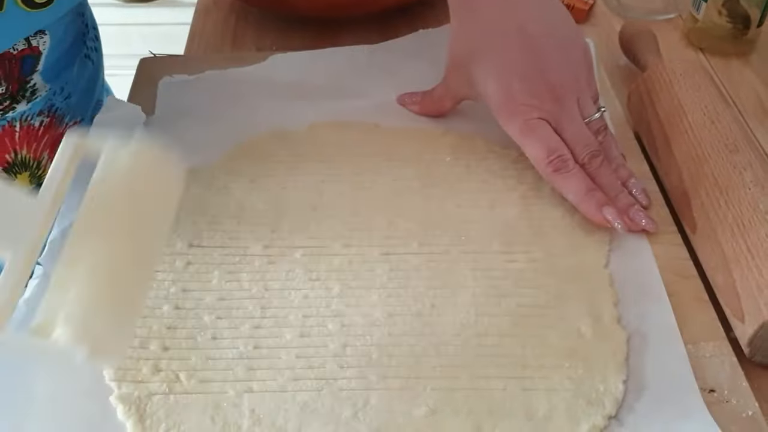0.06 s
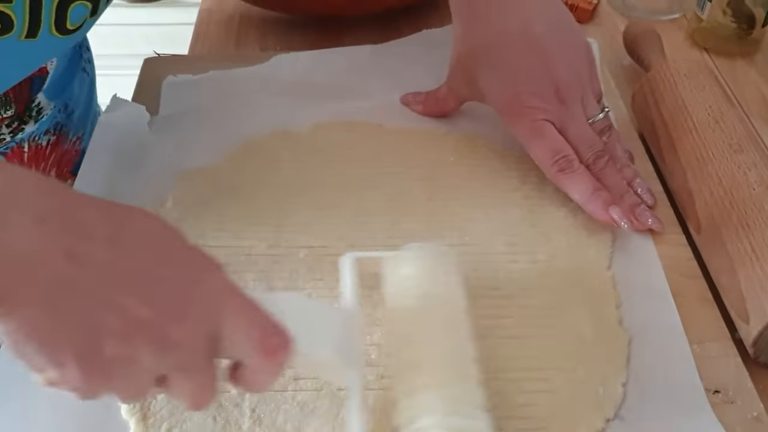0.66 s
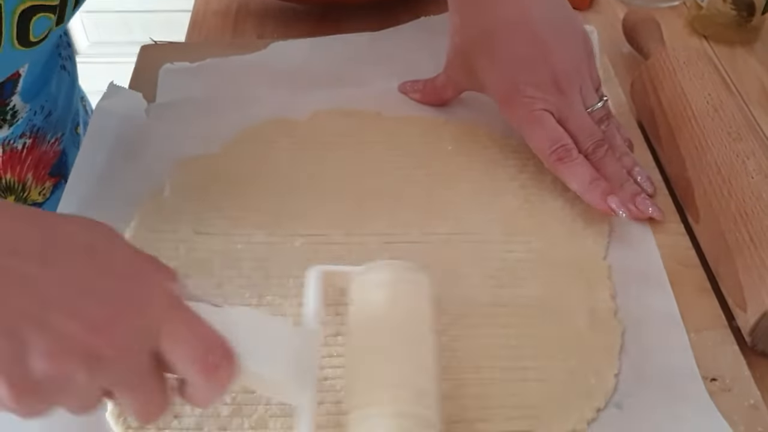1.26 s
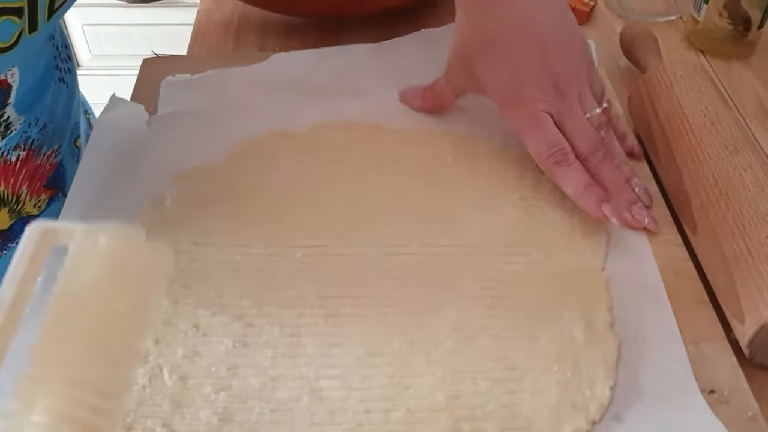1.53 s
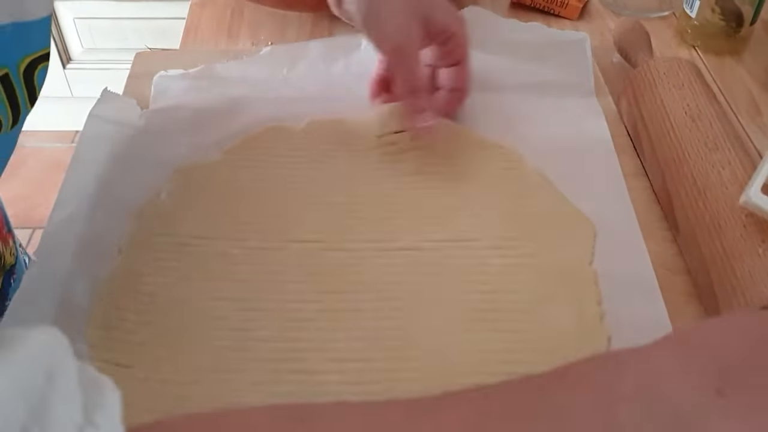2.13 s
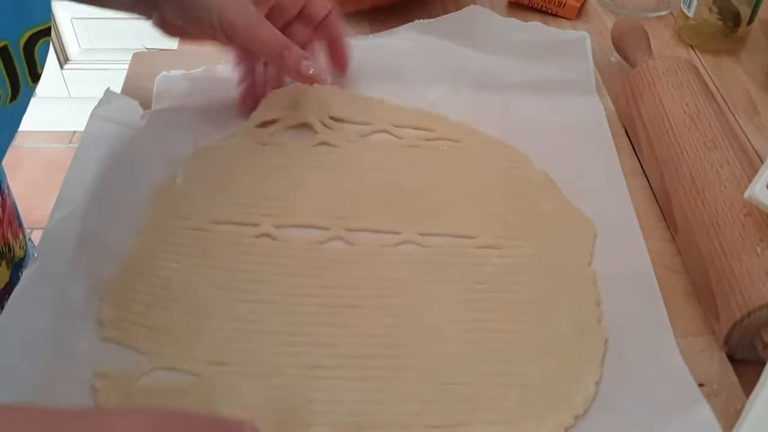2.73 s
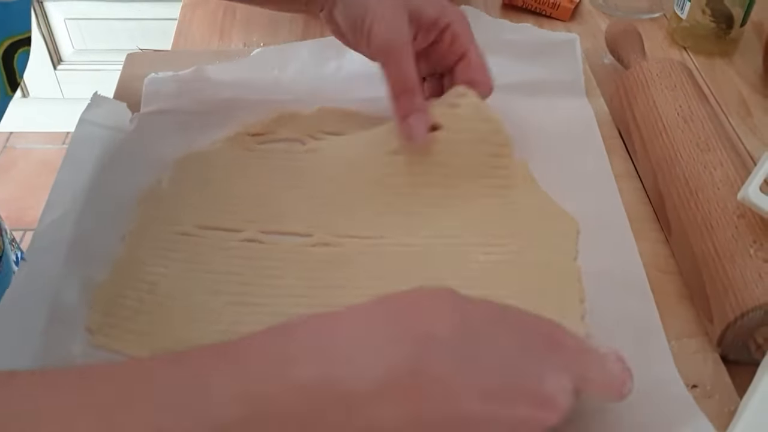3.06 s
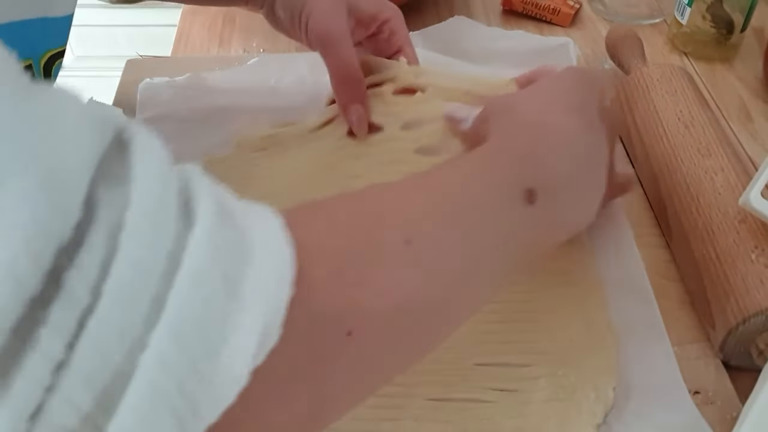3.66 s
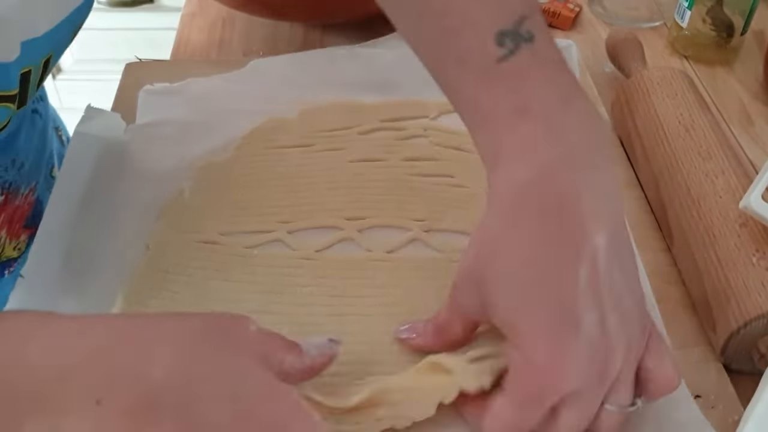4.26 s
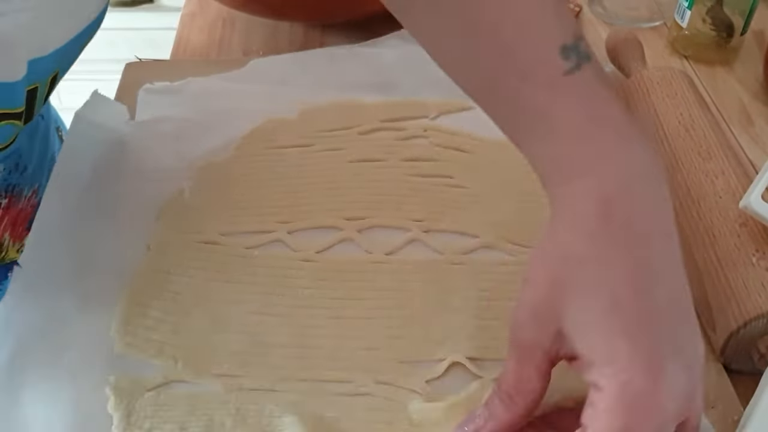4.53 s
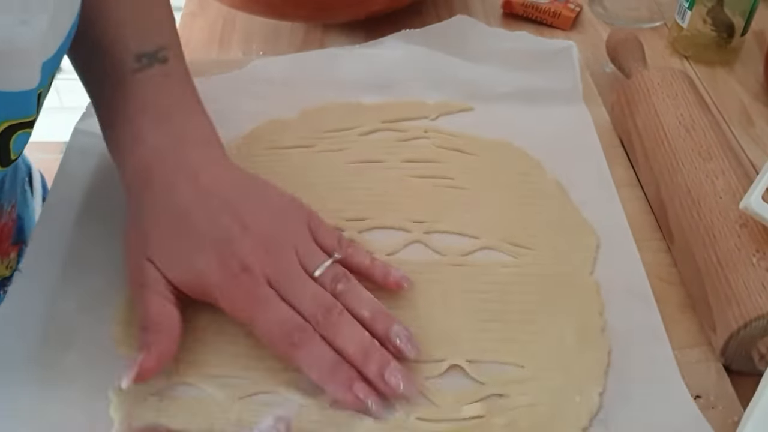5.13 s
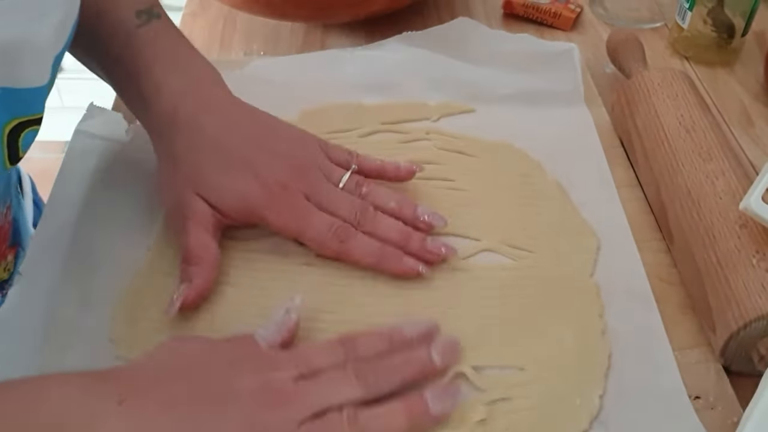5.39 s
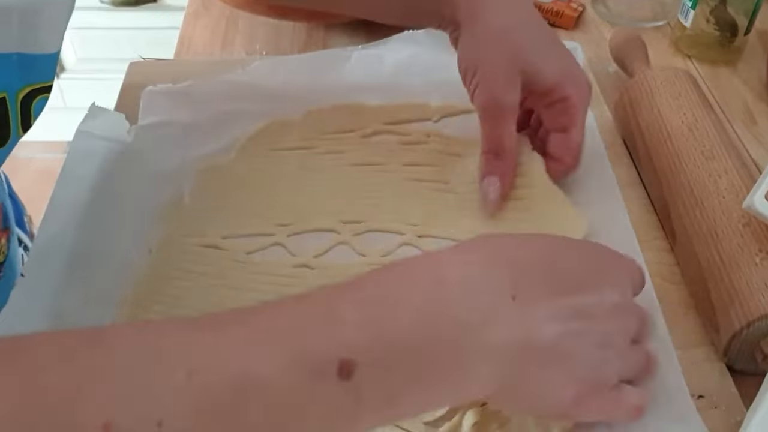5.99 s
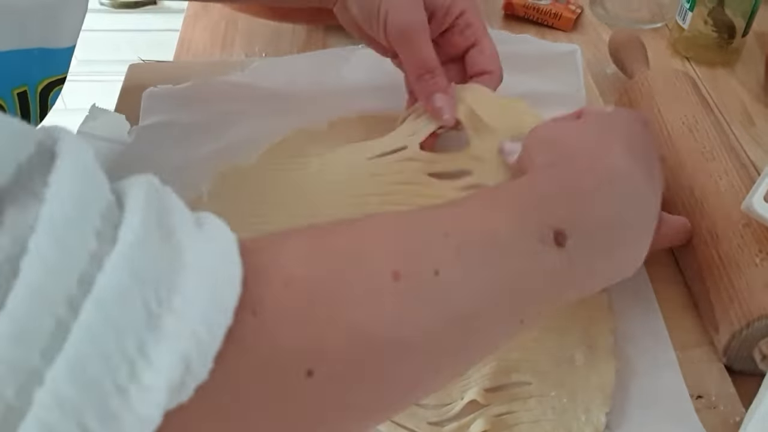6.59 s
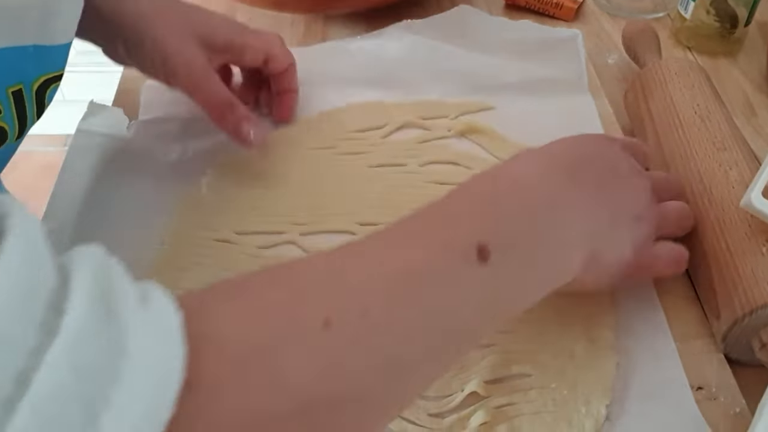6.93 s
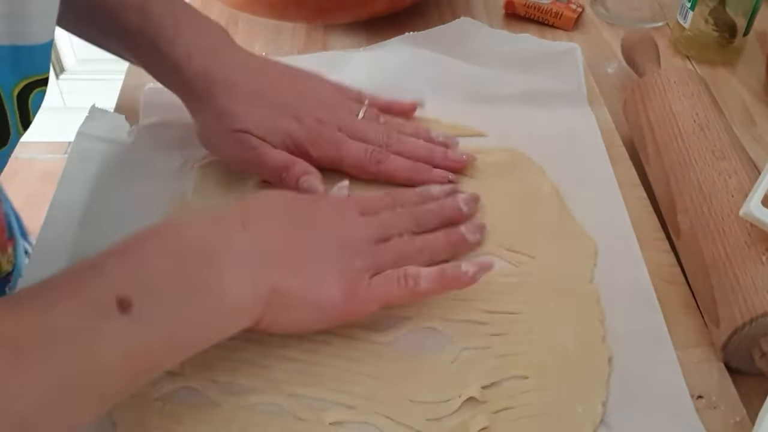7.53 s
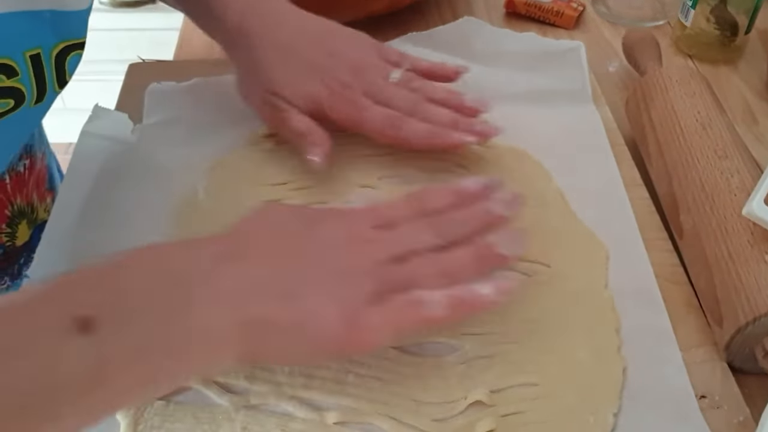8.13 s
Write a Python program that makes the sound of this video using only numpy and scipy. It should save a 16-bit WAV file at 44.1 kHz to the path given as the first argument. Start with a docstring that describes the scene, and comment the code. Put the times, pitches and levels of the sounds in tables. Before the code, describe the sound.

Scratchy sliding and crinkling of baking paper on wood as dough is rolled, pulled and patted, with a few plastic knocks and a low hum.

```python
"""Baking paper under thin pastry, close to a stereo microphone, slides on a wooden table in countless
tiny slips and snaps where it buckles. A plastic lattice roller runs over the pastry, knocks in its frame
and is put down; hands then pull the dough open and pat it flat, dragging the paper in scratchy strokes.
The place is a small kitchen with near walls, a mains hum and a low rumble all around."""
import sys
import numpy as np
from scipy import signal
from scipy.fft import rfft, irfft
from scipy.io import wavfile
from scipy.ndimage import uniform_filter1d, map_coordinates

SR = 44100
rng = np.random.default_rng(int(sys.argv[2]) if len(sys.argv) > 2 else 0)


def inscribe(sig):
    """Save sig as 16-bit PCM at rate SR to the path in sys.argv[1].

    A 1-D sig is mono; a 2-D sig holds one channel per row.
    Samples are clipped to [-1, 1] before scaling.
    """
    pcm = np.round(np.clip(np.atleast_2d(sig).T, -1, 1) * 32767)
    wavfile.write(sys.argv[1], SR, pcm.astype(np.int16))


N = 364266
TIME = np.arange(N) / SR
FREQ = np.maximum(np.fft.rfftfreq(N, 1 / SR), 1)
SIDES = np.array([[.5], [-.5]])  # splits a left-minus-right amount between the channels


def amp(db):
    """Decibels to gain."""
    return 10 ** (np.asarray(db) / 20)


def unit(x):
    """Scale to rms 1."""
    return x / np.sqrt(np.mean(x ** 2))


def shape(x, gain):
    """Filter by a gain for each frequency."""
    return irfft(rfft(x) * gain, N)


def colour(points):
    """Gain for each frequency from (frequency [Hz], level [dB]) points."""
    hz, db = np.transpose(points)
    return amp(np.interp(np.log(FREQ), np.log(hz), db))


def below(hz, order=8):
    """Gain of a smooth low-pass."""
    return 1 / np.sqrt(1 + (FREQ / hz) ** (2 * order))


def resonance(hz, width):
    """Gain of one resonance, 1 at its centre."""
    return 1 / np.sqrt(1 + (2 * (FREQ - hz) / width) ** 2)


def noise():
    """Unrelated white noise for left and right."""
    return rng.standard_normal((2, N))


def walk(per_s):
    """A random wander of rms 1."""
    knots = rng.standard_normal(N // 16)
    return unit(np.interp(TIME * per_s, np.arange(len(knots)), knots))


def burst(at, rise_ms, decay_ms):
    """Envelope of a contact that builds up abruptly and dies away."""
    ms = (TIME - at) * 1000
    fall = np.where(ms < 0, (ms / rise_ms) ** 2, ms / decay_ms)
    return np.exp(-np.minimum(fall, 20))


def widen(x, centred_rad=.33, wide_rad=2.74, halfway_rad=1.73, halfway_from_s=2.05, slew_s=.011):
    """Left and right go out of phase: the bass sits wide, later half-way, and at times in the centre."""
    # spells in which the bass draws to the centre: (start [s], end [s])
    centred_spells = [(0, 0.11), (1.02, 1.17), (1.24, 1.36), (1.62, 1.78), (3.83, 4)]
    angle = np.where(TIME < halfway_from_s, wide_rad, halfway_rad)
    for start, end in centred_spells:
        angle[(TIME >= start) & (TIME < end)] = centred_rad
    phase = uniform_filter1d(angle, int(slew_s * SR)) * SIDES
    return np.real(signal.hilbert(x) * np.exp(1j * phase))


def kitchen(rumble_db=-45, sway_db=1, hum_hz=100, hum_db=-45, bass_edge_hz=190):
    """Room tone: mains hum and swaying rumble reach both channels as one sound, under a diffuse hiss."""
    # spectrum of the still kitchen: (frequency [Hz], level [dB])
    room_tone = [(20, -12.5), (35, 2), (55, -3.5), (75, 2), (140, 1), (200, 0.5), (280, 0), (420, -10.5),
                 (600, -13), (700, -18.5), (750, -11.5), (820, -18), (1100, -27), (2000, -33.5),
                 (5000, -41), (9000, -49.5), (14000, -39.5)]
    level = amp(rumble_db + sway_db * walk(9))
    diffuse = level * unit(shape(noise(), colour(room_tone)))
    shared = level * unit(shape(noise()[0], colour(room_tone)))
    bass = below(bass_edge_hz, order=2)
    hum = amp(hum_db) * unit(np.sin(2 * np.pi * hum_hz * TIME))
    return widen(hum + shape(shared, bass)) + shape(diffuse, np.sqrt(1 - bass ** 2))


def creases(x, spread_db=2, width_hz=350, hold_s=.022):
    """The sheet bends under the hands, so its many broad resonances keep shifting."""
    hz, seconds, frames = signal.stft(x, SR, nperseg=512)
    field = rng.standard_normal((400, 600))
    place = np.meshgrid(hz / width_hz, seconds / hold_s, indexing="ij")
    gain = amp(spread_db * map_coordinates(field, place, order=3, mode="wrap"))
    return signal.istft(frames * gain, SR)[1][:, :N]


def crinkles(per_s=30, size_db=2, decay_ms=3):
    """Now and then a small crease gives way and lifts the level, in dB, for a few milliseconds."""
    gives = rng.random(N) < per_s / SR
    lift_db = size_db * np.minimum(rng.exponential(size=N) + 1, 3)
    return signal.lfilter([1], [1, -np.exp(-1000 / (decay_ms * SR))], gives * lift_db)


def sheet(drive, body_edge_hz=2500, air_edge_hz=8500):
    """The paper's response to a drive, as body (low), hiss (middle) and air (top) bands of rms 1."""
    # colour of the sliding paper: (frequency [Hz], level [dB])
    paper_colour = [(250, 2), (500, -1.5), (800, -2.5), (1200, 0.5), (1800, 2.5), (2600, -1.5), (4300, 4),
                    (5500, 3.5), (6400, 2), (7400, 1.5), (8700, -13), (11500, -8), (13200, -9),
                    (16000, -14.5)]
    spectrum = rfft(drive) * colour(paper_colour)
    low, mid = below(body_edge_hz), below(air_edge_hz, order=16)
    bands = low, np.sqrt(1 - low ** 2) * mid, np.sqrt(1 - mid ** 2)
    return [unit(irfft(spectrum * band, N)) for band in bands]


def moves(pat_air_db=.5, settle_db=-6, settle_t60_s=.18, step_s=.001):
    """Levels in dB of body, hiss and air: each move is one arch of speed, then the sheet settles."""
    # the roller shifts the paper under the pastry; the second row is the crackle that lingers after the sheet
    # buckles at 0.068 s: # (start [s], length [s], fastest at [share of length], hiss [dB], body [dB re hiss],
    # air [dB re hiss])
    rolls = [(-0.002, 0.023, 0.53, -46.5, 0, -1), (0.04, 0.088, 0.34, -54.5, -12.0, -11.5),
             (0.414, 0.071, 0.38, -69.5, -15, 1), (0.506, 0.11, 0.3, -65.0, -16, -7.0),
             (0.607, 0.35, 0.27, -49, -3.5, -3), (0.964, 0.058, 0.44, -52.0, -8.5, -4.0),
             (1.212, 0.372, 0.49, -54.5, -3, -2.5), (1.482, 0.077, 0.29, -47, -5, -7),
             (1.551, 0.14, 0.46, -48.5, -15.0, -2), (1.733, 0.14, 0.3, -54, -21, -1),
             (1.885, 0.097, 0.16, -50.5, -2.5, 2.5)]
    # a hand pulls the dough and drags the paper along: columns as in rolls
    pulls = [(1.941, 0.431, 0.56, -47.5, -3, 1.5), (2.265, 0.44, 0.44, -39, -7.5, -1),
             (2.356, 0.12, 0.62, -28.5, -7.5, 2), (2.667, 0.14, 0.52, -30.5, -10.5, -1),
             (2.856, 0.093, 0.53, -33, -10.5, -1), (2.919, 0.18, 0.39, -36.0, -11.5, 0.5),
             (3.085, 0.15, 0.57, -31, -13, -3), (3.227, 0.26, 0.5, -48.5, -8.5, 1),
             (3.465, 0.11, 0.55, -56.5, -4.5, 4.5), (3.571, 0.12, 0.45, -46, -15, -0.5),
             (3.674, 0.12, 0.53, -43, -4.5, -1), (3.889, 0.42, 0.37, -37.5, -8.5, 0.5),
             (4.101, 0.19, 0.35, -31.5, -11.5, -1.5), (4.206, 0.212, 0.34, -40.5, -11.5, 0),
             (4.377, 0.097, 0.73, -33, -11.5, -1), (4.497, 0.073, 0.69, -26.5, -14.5, -1),
             (4.578, 0.13, 0.63, -28, -13, -6.0), (5.049, 0.15, 0.39, -37.5, -7.5, -2.5),
             (5.165, 0.13, 0.52, -37, -7.5, -1), (5.861, 0.21, 0.37, -36, -13.5, -2),
             (6.054, 0.16, 0.31, -37.5, -14.5, -1.0), (6.162, 0.22, 0.48, -43, -8.5, 0.0),
             (6.322, 0.23, 0.32, -51, -18, 2.5), (6.513, 0.162, 0.35, -41, -13, 2),
             (6.668, 0.071, 0.56, -54, -18, 4.5), (6.774, 0.071, 0.82, -46.5, -1.5, -0.5),
             (6.917, 0.29, 0.35, -40, -10.5, 1), (7.047, 0.148, 0.64, -32.0, -8.5, -0.5),
             (7.168, 0.22, 0.37, -45.0, -5.5, -0.5), (7.315, 0.22, 0.41, -42.5, -10, 0.5)]
    # a flat hand pats the dough and the paper slides briefly: columns as in rolls, without air
    pats = [(4.784, 0.067, 0.49, -33.5, -14), (4.932, 0.109, 0.1, -37.5, -5.5),
            (5.387, 0.067, 0.6, -38.5, -14.5), (5.517, 0.1, 0.61, -34.5, -22),
            (5.69, 0.042, 0.55, -42, -16), (7.565, 0.1, 0.58, -40.5, -18), (7.721, 0.094, 0.51, -45, -18),
            (7.868, 0.13, 0.43, -45, -16.0), (8.078, 0.088, 0.49, -36.5, -13.5)]
    roll_power, pull_power, pat_power = .73, 1, 1.82  # a higher power makes the arch more pointed
    strokes = [(*roll, roll_power) for roll in rolls]
    strokes += [(*pull, pull_power) for pull in pulls]
    strokes += [(*pat, pat_air_db, pat_power) for pat in pats]
    t = np.arange(0, N / SR, step_s)
    energy = 1e-12
    for start, length, fastest, db, body_db, air_db, power in strokes:
        progress = np.clip((t - start) / length, 0, 1)
        skew = np.log(.5) / np.log(np.clip(fastest, .1, .9))
        speed = np.abs(np.sin(np.pi * progress ** skew))
        band_gains = amp(db + np.array([body_db, 0, air_db]))
        energy = energy + np.outer(band_gains, speed ** power) ** 2
    retained = np.exp(-2 * np.log(1000) * step_s / settle_t60_s)
    settling = amp(settle_db) ** 2 * signal.lfilter([1 - retained], [1, -retained], energy)
    return [np.interp(TIME, t, 10 * np.log10(band)) for band in energy + settling]


def sliding(slips_per_s=1800, size_db=3, grit_db=-14.5, judder_db=1, grip_db=.97, flicker_db=1.3):
    """Paper on wood moves in tiny slips; the grip is uneven and the sheet judders as it catches."""
    slips = rng.random(N) < slips_per_s / SR
    sizes = amp(size_db * np.minimum(rng.exponential(size=N), 5))
    grains = uniform_filter1d(slips * sizes, size=8)  # a slip lasts a fraction of a millisecond
    friction = creases(noise() * (1 + amp(grit_db) * unit(grains)))
    pressure_db = judder_db * walk(170) + crinkles() + grip_db * walk(35)
    balance_db = 0, -.8, .6  # body, hiss, air
    return sum(band * amp(move_db + pressure_db + band_db + flicker_db * walk(60))
               for band, move_db, band_db in zip(sheet(friction), moves(), balance_db))


def snaps(rise_ms=3.86, decay_ms=4.8, gain_db=-.84, board_hz=1250, board_width_hz=1500):
    """Short bursts of crackle from the same sheet, dull under a finger and bright at a crease."""
    # the paper buckles or a finger taps it:
    # (time [s], hiss [dB], body [dB re hiss], air [dB re hiss], left minus right [dB])
    buckles = [(0.068, -33.5, -19, -12, -1), (0.5195, -46.5, -8, -2, -1), (1.2293, -45.5, -4.5, -17, 0),
               (1.516, -32, -9, -11, 1), (2.2783, -20, -12.5, -3, -2.5), (2.3926, -24.5, -7, 4.5, 2),
               (2.464, -25.5, -19, 0, 1), (2.5264, -23, -12, 2, 1.5), (2.677, -34.5, -19, 3, 1),
               (2.876, -36, -3, 5, -3), (2.907, -30.5, -11, -2, -7), (2.998, -37, 3.5, -5, 2),
               (3.185, -34, 3.5, -10, -1), (3.3143, -32.5, 4, -22, 1.5), (3.4066, -33.5, -5, -4, -2),
               (4.122, -27, -14, 3, 1), (4.514, -37, -15, 3, 0), (4.6314, -20.5, -15, 3, -1),
               (4.7214, -32.5, -8, -25, -2), (4.776, -33.5, -20, -6, 0), (4.804, -36.5, -17, 11, 2),
               (5.084, -29.5, -0.5, 6.5, 2.5), (5.2813, -24, -11, -5, 2), (5.885, -26, -7.5, -11, -3.5),
               (5.9982, -25, -5.5, -23, 1), (6.136, -31, -7, -8, -1), (6.2513, -28, -0.5, -26, -1.5),
               (7.0864, -26, -29, 0.5, -8), (7.1335, -22, -20, -11, -7), (7.2594, -42.5, 3, 3, -4),
               (7.326, -23, -10.5, 8.5, -4), (7.346, -26.5, -5.5, -2, 1.5)]
    body, hiss, air = sheet(creases(noise()))
    body = unit(shape(body, resonance(board_hz, board_width_hz)))  # the wood beneath answers a tap
    out = 0
    for at, db, body_db, air_db, pan_db in buckles:
        crackle = hiss + amp(body_db) * body + amp(air_db) * air
        out += amp(db + gain_db + pan_db * SIDES) * burst(at, rise_ms, decay_ms) * crackle
    return out


def roller_knocks(rise_ms=3.1, tick_db=-11, gain_db=-2.5, accent_db=-1, accent_width_hz=600):
    """The roller's axle rattles against the hollow plastic frame."""
    # knocks of the axle: (time [s], level [dB], most excited resonance [Hz], decay [ms])
    knocks = [(0.706, -23, 1880, 3.2), (0.7506, -17.5, 3930, 4.9), (0.767, -33, 1400, 12),
              (0.844, -28.5, 2200, 2.3), (1.8735, -33, 2080, 6), (1.9526, -39, 1900, 7.7),
              (1.98, -23.5, 3620, 8.1)]
    # resonances of the plastic frame: (frequency [Hz], width [Hz], level [dB])
    frame_modes = [(322, 92, -8), (705, 150, -6), (970, 87, -3), (1520, 320, -11), (3060, 310, -19),
                   (4050, 160, -34), (4640, 130, -28), (6090, 200, -14)]
    frame_power = amp(tick_db) ** 2
    frame_power += sum((amp(db) * resonance(hz, width)) ** 2 for hz, width, db in frame_modes)
    rattle, out = noise(), 0
    for at, db, hz, decay_ms in knocks:
        accent = amp(accent_db) * resonance(hz, accent_width_hz)
        response = np.sqrt(frame_power + accent ** 2)
        contact = below(200000 * amp(db), order=1)  # harder knocks are brighter
        knock = unit(shape(rattle, response * contact))
        out += amp(db + gain_db) * burst(at, rise_ms, decay_ms) * knock
    return out


def roller_landing(rise_ms=3, crack_ms=2.1, crack_hz=5500, ring_db=-9):
    """The roller hits the table and bounces; each contact cracks, and the first sets it ringing."""
    # contacts with the table: (time [s], level [dB])
    contacts = [(2.0718, -18.5), (2.084, -26.5), (2.101, -26)]
    # what rings on landing: (frequency [Hz], level [dB], time to fall 60 dB [s])
    ring_modes = [(838, -4, .11), (1070, -4, .12), (1135, 0, .15), (1220, -6, .11), (2835, -4, .08),
                  (2925, -2, .09), (180, -15, .2), (253, -14, .2), (370, -12, .15), (560, -11, .09),
                  (1631, -12, .09), (4110, -9, .07), (4270, -10, .08), (4850, -12, .07), (5130, -12, .07)]
    crack = unit(shape(noise(), below(crack_hz, order=2)))
    out = sum(amp(db) * burst(at, rise_ms, crack_ms) for at, db in contacts) * crack
    first_at, first_db = contacts[0]
    for hz, mode_db, t60 in ring_modes:
        fade = burst(first_at, rise_ms, t60 * 1000 / np.log(1000))
        tone = np.sin(2 * np.pi * (hz * TIME + rng.random((2, 1))))
        out += amp(first_db + mode_db + ring_db) * fade * tone
    return out


def room(x, wet_db, t60, damp_hz=9000, gap_s=.005):
    """Close walls and cupboards return a short, slightly dull tail to the microphone."""
    t = TIME[:SR // 2]
    reflections = shape(noise(), below(damp_hz, order=1))[:, :len(t)]
    tail = reflections * amp(-60 * t / t60) * (t > gap_s)
    tail /= np.sqrt(np.sum(tail ** 2, axis=1, keepdims=True))
    return x + amp(wet_db) * signal.fftconvolve(x, tail, axes=1)[:, :N]


def scene():
    """Paper and roller close by on the table, their treble leaning right, in the humming kitchen."""
    # stereo balance of the table at the microphone: (frequency [Hz], left minus right [dB])
    balance = [(400, 0), (1500, -1.5), (4500, -0.5), (7500, -1), (9000, -5.5), (11000, -7), (13000, 0),
               (15500, -8.5)]
    paper = room(sliding(), wet_db=-13.5, t60=.18) + room(snaps(), wet_db=-9, t60=.16)
    roller = room(roller_knocks() + roller_landing(), wet_db=-10.5, t60=.28)
    return shape(paper + roller, colour(balance) ** SIDES) + kitchen()


def record(dry):
    """The recorder rounds the very loudest peaks and cuts the top steeply."""
    ceiling, top_hz = .85, 15900
    rounded = dry / (1 + (dry / ceiling) ** 4) ** (1 / 4)
    return signal.sosfilt(signal.ellip(10, .2, 70, top_hz, fs=SR, output="sos"), rounded)


dry = scene()
out = record(dry)
inscribe(out)
```